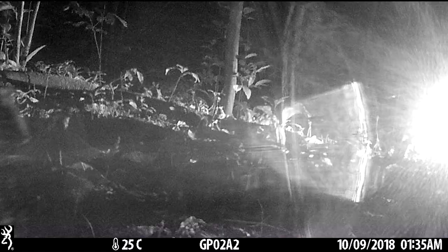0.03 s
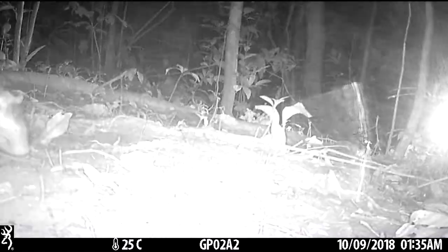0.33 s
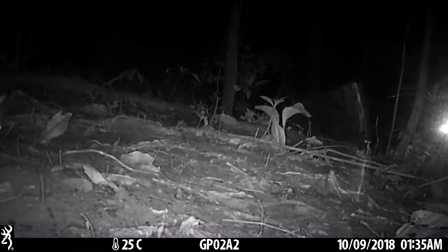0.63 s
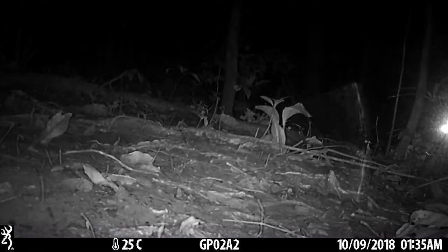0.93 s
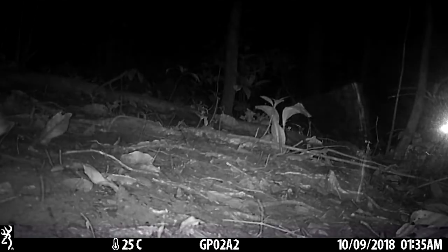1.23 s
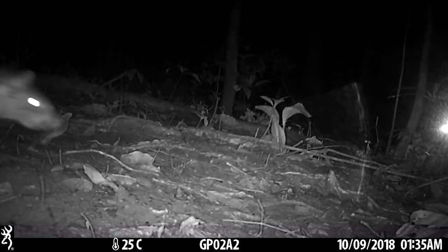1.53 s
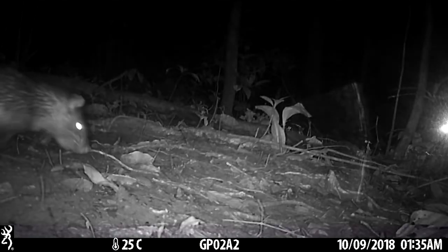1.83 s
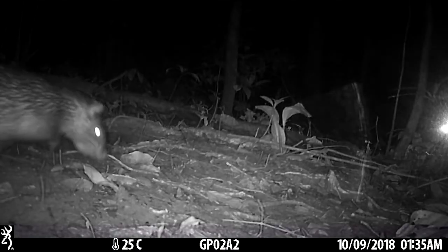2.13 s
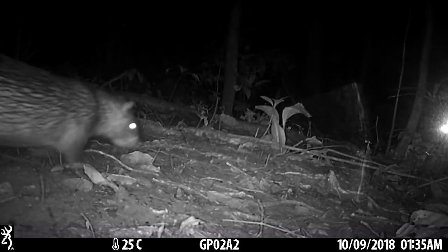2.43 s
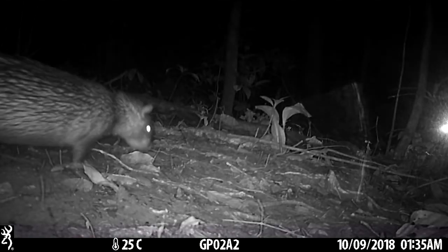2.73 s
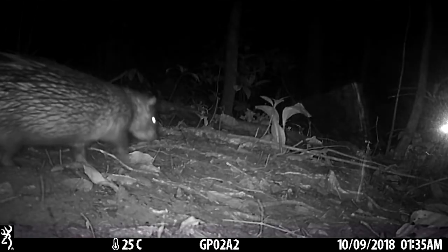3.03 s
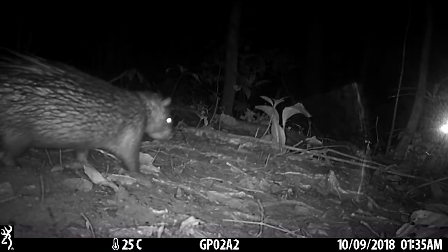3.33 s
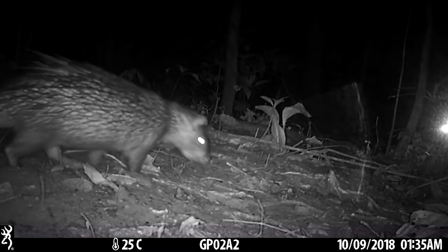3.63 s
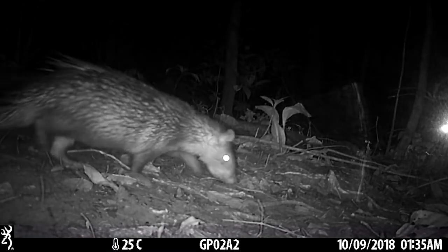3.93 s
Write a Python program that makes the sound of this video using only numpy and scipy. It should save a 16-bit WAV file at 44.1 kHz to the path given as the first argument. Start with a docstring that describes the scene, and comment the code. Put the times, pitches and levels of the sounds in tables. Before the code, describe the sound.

A dense chorus of crickets and other insects trills at night, with frogs rattling underneath.

```python
"""Crickets and frogs trill in a tropical forest at night, far off, in separate bands blurred by the trees.
A nearer caller whistles a short run of notes, a frog rattles in low bouts, another peeps now and then,
and a close cricket starts falling chirps near the end. Every call is made of gliding sine pulses.
Beneath them a porcupine faintly stirs the leaf litter, a low drone swells once and the forest hisses."""
import sys
import numpy as np
from scipy import signal
from scipy.fft import rfft, irfft
from scipy.io import wavfile

SR = 44100
rng = np.random.default_rng(int(sys.argv[2]) if len(sys.argv) > 2 else 0)


def to_wav(s):
    """Save 16-bit WAV."""
    ch = np.atleast_2d(s).T  # columns
    pcm = np.round(np.clip(ch, -1, 1) * 32767)  # PCM
    wavfile.write(sys.argv[1], SR, pcm.astype(np.int16))


N = 176400


def undb(db):
    """Decibels to gain."""
    return 10 ** (np.asarray(db) / 20)


def level(x, db):
    """Scale to an rms level."""
    return x * undb(db) / np.sqrt(np.mean(x ** 2))


def clock():
    """Sample times in s."""
    return np.arange(N) / SR


def curve(points):
    """Gain along (time [s], gain [dB]) points."""
    return undb(np.interp(clock(), *np.array(points).T))


def wander(count):
    """Slow random line through count points."""
    return np.interp(np.arange(N), np.linspace(0, N, count), rng.standard_normal(count))


def forest(x, wet_db, t60_s=0.65):
    """Direct sound plus decaying scatter from trunks and leaves."""
    tail = rng.standard_normal(SR) * np.exp(-np.log(1000) * clock()[:SR] / t60_s)
    return x + undb(wet_db) * signal.fftconvolve(x, tail / np.linalg.norm(tail))[:N]


def note(peak_s, rise_s, fall_s, hz, sweep_hz, db, taper=1.25):
    """One pure note that swells and fades as it glides through hz."""
    t = clock() - peak_s
    on = (t > -rise_s) & (t < fall_s)
    t, out = t[on], np.zeros(N)
    envelope = np.cos(np.pi / 2 * np.where(t < 0, t / rise_s, t / fall_s)).clip(0) ** taper
    pitch_hz = hz + sweep_hz * ((t + rise_s) / (rise_s + fall_s) - .5)
    out[on] = undb(db) * envelope * np.sin(2 * np.pi * np.cumsum(pitch_hz) / SR)
    return out


def trill(hz, pulses_per_s, sweep_hz, duty, waver_hz, scatter_db=2.0, rate_drift=0.02985):
    """One animal's train of gliding pulses, each with its own strength and pitch."""
    cycles = rng.random() + np.cumsum(pulses_per_s * (1 + rate_drift * wander(30))) / SR
    pulse = cycles.astype(int)
    progress = np.minimum((cycles - pulse) / duty, 1)
    strength, detune = rng.standard_normal((2, 512))
    pitch_hz = hz + sweep_hz * (progress - .5) + waver_hz * detune[pulse]
    envelope = undb(scatter_db * strength)[pulse] * np.sin(np.pi * progress) ** 2
    return envelope * np.sin(2 * np.pi * np.cumsum(pitch_hz) / SR)


def choir(hz, spread_hz, pulses_per_s, sweep_hz, db, duty, waver_hz, count, wet_db=2):
    """Far animals of one kind, each at its own pitch and pace, heard through the trees."""
    voices = np.zeros(N)
    for offset_hz in spread_hz * np.linspace(-.5, .5, count):
        pace = 1 + .07 * rng.standard_normal()
        voices += trill(hz + offset_hz, pulses_per_s * pace, sweep_hz, duty, waver_hz)
    return level(forest(voices, wet_db), db)


def far_crickets():
    """Four cricket choirs merge into one dense band: a loud core above a softer flank."""
    # choirs (pitch [Hz], spread [Hz], pulse rate [1/s], sweep [Hz], base level [dB])
    groups = [(3505, 320, 37, -160, -67), (3828, 280, 33, -200, -57), (4150, 220, 26, -220, -49.5),
              (4414, 170, 23, -220, -49.5)]
    # swell of the lower two choirs (time [s], gain [dB])
    flank_swell = [(0, 0.5), (1.0, 0.5), (1.7, 0.5), (2.3, -0.5), (3.0, 0), (4, 0.5)]
    # swell of the upper two choirs (time [s], gain [dB])
    core_swell = [(0, 0), (.35, 0), (.55, 2), (.8, 0.5), (1.1, 1.6), (1.5, 1.7), (2.15, 1.9), (2.6, -0.8),
                  (3.1, 0.5), (3.5, 0.5), (4, 2)]
    choirs = [choir(*row, duty=.55, waver_hz=54.89, count=10) for row in groups]
    return sum(choirs[:2]) * curve(flank_swell) + sum(choirs[2:]) * curve(core_swell)


def whistler():
    """A nearer caller whistles a run of slightly rising notes."""
    # notes (peak [s], rise [s], fall [s], pitch [Hz], level [dB])
    notes = [(.147, 0.034, 0.044, 3543, -40.5), (.19, 0.021, 0.062, 3545, -41.5),
             (.27, 0.061, 0.031, 3563, -36.5), (.365, 0.043, 0.021, 3557, -35),
             (.417, .015, 0.0095, 3574, -40), (.458, 0.034, 0.021, 3574, -35),
             (.548, 0.065, 0.041, 3579, -36.5), (.648, 0.064, 0.029, 3570, -35),
             (.712, 0.027, 0.046, 3560, -41.5), (.79, .03, 0.17, 3540, -55)]
    return sum(note(peak_s, rise_s, fall_s, hz, sweep_hz=25.2, db=db)
               for peak_s, rise_s, fall_s, hz, db in notes)


def close_cricket():
    """Quick, steeply falling chirps with little scatter."""
    # chirps (peak [s], centre pitch [Hz], level [dB])
    chirps = [(3.222, 4150, -39), (3.287, 4260, -33.5), (3.334, 4270, -33.5), (3.382, 4240, -32.5),
              (3.427, 4285, -31), (3.476, 4290, -32.5), (3.521, 4276, -31.5), (3.571, 4310, -33),
              (3.621, 4310, -32.5), (3.668, 4290, -31.5), (3.716, 4260, -30.5), (3.766, 4310, -32),
              (3.813, 4290, -32), (3.864, 4300, -32), (3.912, 4290, -31.5), (3.962, 4320, -31.5)]
    voice = sum(note(peak_s, rise_s=.011, fall_s=.0125, hz=hz, sweep_hz=-500, db=db, taper=0.76)
                for peak_s, hz, db in chirps)
    return forest(voice, wet_db=-20.5)


def peeping_frog():
    """Sparse, short peeps that fall slightly."""
    # peeps (peak [s], level [dB])
    peeps = [(.43, -49), (.672, -50), (2.136, -51), (2.34, -49), (3.441, -47), (3.635, -46.5)]
    return sum(note(peak_s, rise_s=.014, fall_s=.019, hz=2575, sweep_hz=-70, db=db)
               for peak_s, db in peeps)


def rattling_frog(pulses_per_s=41.75, duty=.75, scatter_db=0.84):
    """A nearer frog's low, even trill of rising pulses, in bouts that swell and stop short."""
    # bouts (start [s], end [s], swell [s], full level [dB])
    bouts = [(0.794, 1.375, 0.06, -54), (2.249, 2.9, 0.33, -55), (3.313, 3.85, 0.068, -55)]
    voice, half_s = np.zeros(N), duty / pulses_per_s / 2
    for start_s, end_s, swell_s, db in bouts:
        peaks_s = np.arange(start_s, end_s, 1 / pulses_per_s)
        for peak_s, pulse_db in zip(peaks_s, rng.normal(db, scatter_db, 40)):
            effort = min(.5 + .5 * (peak_s - start_s) / swell_s, 1)
            voice += effort * note(peak_s, half_s, half_s, hz=1683.5, sweep_hz=130, db=pulse_db)
    return forest(voice, wet_db=-13.5)


def high_insects():
    """Near-steady trills above the crickets, plus a thin pair that fades and returns."""
    # choirs (pitch [Hz], spread [Hz], pulse rate [1/s], sweep [Hz], base level [dB])
    groups = [(4770, 81, 43, -110, -58), (5060, 480, 50, -160, -58), (5186, 70, 67, -89.5, -64),
              (5499, 230, 61, -160, -57), (5880, 110, 70, -100, -71), (6130, 300, 50, -150, -82.5),
              (7140, 250, 55, -150, -83.5)]
    # slight swell of all those choirs (time [s], gain [dB])
    steady_swell = [(0, 1), (.6, 0), (1.5, 0.1), (2.4, 0), (3.2, 0), (3.55, -1), (3.9, .5)]
    # swell of the thin pair (time [s], gain [dB])
    thin_swell = [(0, -1), (.9, 1.5), (1.4, -14), (2.2, -10), (2.6, -4), (3.3, -11), (3.65, 1), (4, 5)]
    steady = sum(choir(*row, duty=.7, waver_hz=31.89, count=6) for row in groups)
    thin = choir(hz=5020, spread_hz=20.5, pulses_per_s=27, sweep_hz=-41.5, db=-58,
                 duty=.85, waver_hz=16, count=2)
    return steady * curve(steady_swell) + thin * curve(thin_swell)


def far_frogs():
    """Three rattling choirs; the low and the high one swell and dip."""
    # swell of the low choir (time [s], gain [dB])
    low_swell = [(0, -3), (.45, 0.5), (.7, -1), (1.3, -3.5), (1.45, -8), (1.55, -0.5), (1.85, 2),
                 (2.2, -5.5), (2.6, 4), (3, -1.5), (3.25, -6), (3.7, 2), (4, 1.5)]
    # swell of the high choir (time [s], gain [dB])
    high_swell = [(0, -2), (.47, 3.5), (.62, -2), (.78, 1.5), (1.3, -0.5), (1.45, -4.5), (1.55, -8.5),
                  (1.64, 2.5), (2.05, 0.5), (2.4, 1), (3.2, -0.5), (3.4, 0.5), (4, 0)]
    low = choir(hz=1630, spread_hz=110, pulses_per_s=43, sweep_hz=100, db=-65,
                duty=.65, waver_hz=18, count=4, wet_db=-5)
    mid = choir(hz=2200, spread_hz=170, pulses_per_s=31, sweep_hz=110, db=-64,
                duty=.45, waver_hz=27.9, count=5, wet_db=1.5)
    high = choir(hz=2620, spread_hz=200, pulses_per_s=37, sweep_hz=90, db=-59,
                 duty=.45, waver_hz=35.28, count=6, wet_db=3)
    return low * curve(low_swell) + mid + high * curve(high_swell)


def leaf_litter(band_hz=(4000, 9000)):
    """Dry leaves crackle softly under the porcupine."""
    # rustles (peak [s], length [s], level [dB])
    rustles = [(0.806, .012, -68), (.91, .08, -74), (1.0, .045, -71), (1.72, .17, -78), (2.372, .08, -79)]
    grains = rng.standard_normal(N) * undb(4 * rng.standard_normal(N))
    crackle = signal.sosfilt(signal.butter(2, band_hz, "band", fs=SR, output="sos"), grains)
    envelope = sum(undb(db) * np.exp(-(2 * (clock() - peak_s) / length_s) ** 2)
                   for peak_s, length_s, db in rustles)
    return level(crackle, 0) * envelope


def drone(hz=425, width_hz=24, peak_s=2.0, swell_s=0.21):
    """A faint, far drone of narrow-band noise rises and fades once."""
    band = np.exp(-((np.fft.rfftfreq(N, 1 / SR) - hz) / width_hz) ** 2)
    noise = irfft(rfft(rng.standard_normal(N)) * band, N)
    return level(noise, db=-86.5) * np.exp(-((clock() - peak_s) / swell_s) ** 2)


def hiss():
    """Steady noise of the far forest and the microphone."""
    # spectrum (frequency [Hz], relative density [dB])
    spectrum = [(25, -8), (100, -3.5), (250, -1.5), (450, 0), (900, 0), (1400, -0.5), (1950, 2), (3100, 7),
                (4300, 7.5), (6150, -1), (6600, -1.5), (8000, -6), (11000, -8), (16000, -11.5)]
    hz, db = np.array(spectrum).T
    gain = undb(np.interp(np.log(np.fft.rfftfreq(N, 1 / SR) + 1), np.log(hz), db))
    return level(irfft(rfft(rng.standard_normal(N)) * gain, N), db=-67.5)


def scene():
    """Far choirs, near callers and background, heard in mono near the ground."""
    far = far_crickets() + high_insects() + far_frogs()
    near = rattling_frog() + forest(whistler() + peeping_frog(), wet_db=-16.5) + close_cricket()
    return (far + near + leaf_litter() + drone() + hiss())[None]


def record(dry, start_s=.094, ramp_s=.002, cutoff_hz=15750):
    """The sound switches on just after the start; a steep low-pass cuts the top."""
    gate = np.clip((clock() - start_s) / ramp_s, 0, 1)
    return signal.sosfilt(signal.ellip(10, .2, 70, cutoff_hz, fs=SR, output="sos"), dry * gate)


dry = scene()
out = record(dry)
to_wav(out)
```